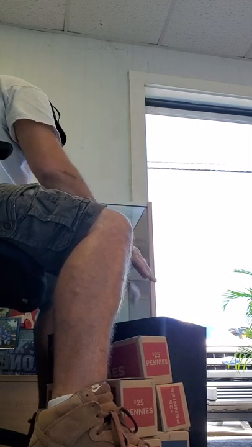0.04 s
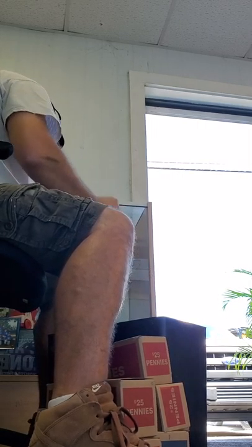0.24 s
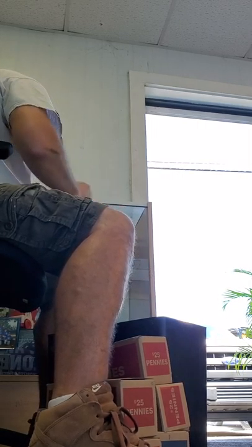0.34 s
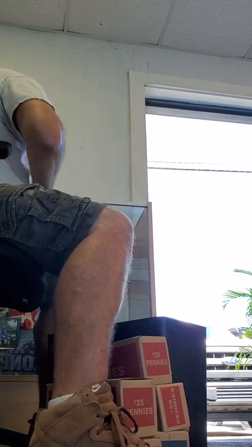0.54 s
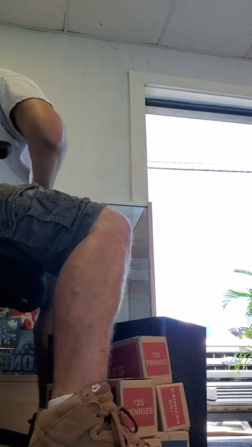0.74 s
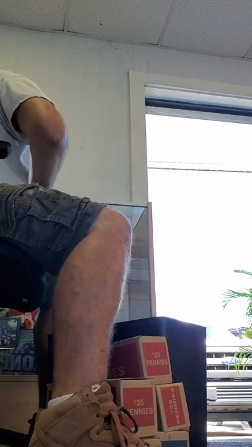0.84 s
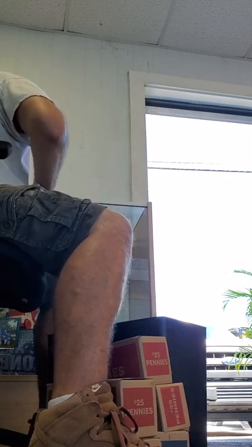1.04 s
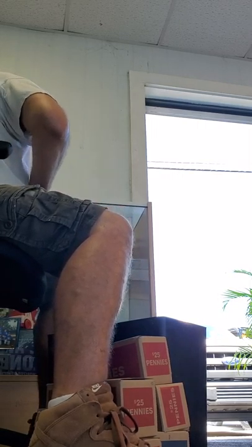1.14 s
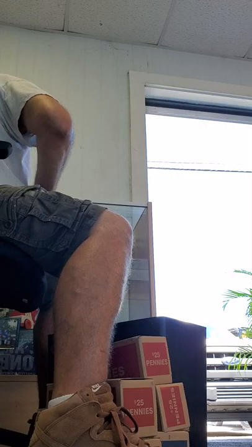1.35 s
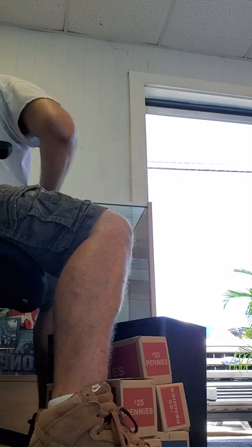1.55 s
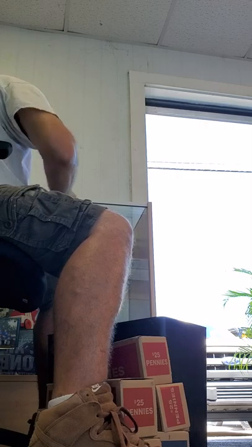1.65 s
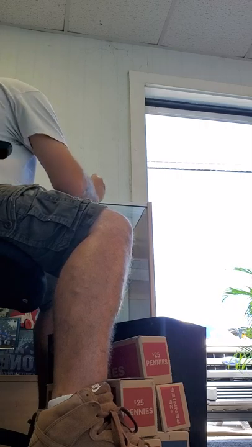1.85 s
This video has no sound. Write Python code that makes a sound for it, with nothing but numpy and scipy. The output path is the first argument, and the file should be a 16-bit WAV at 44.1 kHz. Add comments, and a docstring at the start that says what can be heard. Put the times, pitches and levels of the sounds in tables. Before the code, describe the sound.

A large mass of coins thuds onto a hard counter, then slides out in clattering, jingling surges and settles. Two faint nudges on the counter follow. Ventilation hums steadily in the small room, heard from close by.

```python
"""Ventilation hums in a small room, then a heavy load of coins thuds onto a shop counter.
The blow sets the counter ringing. The heap collapses and slides out in surges: thousands of tiny hits
clatter on the top, jingle edge against edge and shimmer as the faces skid over each other.
Two light nudges on the counter follow. The air hums throughout, and an automatic volume control
turns everything down during the crash and creeps back afterwards."""
import sys
import numpy as np
from scipy import signal
from scipy.fft import rfft, irfft
from scipy.io import wavfile
from scipy.ndimage import uniform_filter1d

SR = 44100
rng = np.random.default_rng(int(sys.argv[2]) if len(sys.argv) > 2 else 0)


def to_wav(sig):
    """Store sig (one row per channel, or 1-D mono) as 16-bit WAV at the path in sys.argv[1].

    Samples outside -1..1 are clipped; the rate is SR.
    """
    pcm = np.clip(np.atleast_2d(sig), -1, 1) * 32767
    pcm = np.round(pcm).astype(np.int16)
    wavfile.write(sys.argv[1], SR, pcm.T)  # frames by channels


N = 83790
T = np.arange(N) / SR
BIN_HZ = np.maximum(np.arange(N // 2 + 1) * SR / N, 1)  # the frequencies in a spectrum of the scene
CUTOFF_HZ, MIC_LAG_S = 15800, .0003  # top of the treble; usual limit of the left-right delay

# How alike the two microphones sound. Each row: frequency in Hz, likeness from 0 to 1.
STEREO_LIKENESS = [(100, 1), (300, 1), (650, 0.77), (1300, 0), (2500, 0), (15000, 0)]
# The tone of rushing air. Each row: frequency in Hz, relative level in dB.
AIR_TONE = [(30, -11.5), (50, -16), (75, -16), (100, -5), (140, -5), (200, -6.5), (300, -10), (450, -17),
            (700, -17), (1100, -23), (2200, -27.5), (3200, -40), (6000, -46.5), (9000, -53), (15500, -46.5)]
# The ventilation's hums. Each row: pitch in Hz, width in Hz, level in dB.
AIR_HUMS = [(137.2, 13, -44), (467, 7.2, -55.5), (3940, 88, -73.5), (6530, 71, -75.5)]
# How its deep drone swells and sinks. Each row: time in seconds, level in dB.
DRONE_LEVELS = [(0, -44), (.25, -44.5), (.55, -52), (.85, -46), (1.02, -37), (1.18, -46), (1.32, -41.5),
                (1.48, -45.5), (1.65, -40.5), (1.9, -36.5)]

# The counter's modes, the pitches at which it likes to ring. Each entry: pitch in Hz.
COUNTER_PITCHES = [143, 219, 250, 286, 322, 350, 426, 463, 538, 628, 700, 851, 1150]
# The same modes. Each row: level under a blow in dB, relative level under sliding coins in dB,
# ring time in seconds. A ring time (t60) is how long a sound takes to fade by 60 dB.
COUNTER_MODES = [(-14, -3.5, 0.3), (-15.5, -10, 0.23), (0.5, -1.5, 0.031), (-7.5, -2.5, 0.17),
                 (-9.5, -3.5, 0.17), (-14.5, -8, 0.127), (-21, -6, 0.2), (-14.5, -16.5, .14),
                 (-13, -6, 0.2), (-8, -8.5, 0.12), (-20.5, -16, 0.27), (-25.5, -12, 0.13), (-17, -9, 0.13)]
# Counter notes that swell as the heap spreads. Each entry: pitch in Hz.
NOTE_PITCHES = [351, 304, 1684]
# The same notes. Each row: start in seconds, rise in seconds, level in dB, ring time in seconds.
NOTE_SWELLS = [(.265, 0.071, -14.5, 0.4), (.44, 0.13, -27, 0.76), (.43, 0.16, -29, 0.18)]
# Blows of the load, then light nudges. Each row: start in seconds, level in dB, contact in seconds.
COUNTER_BLOWS = [(0.2449, -2, 0.00082), (0.2639, -10.5, 0.00084), (.279, -11.5, 0.00047),
                 (1.556, -28, 0.003), (1.794, -30, 0.0014)]
# Modes of the top under the coins. Each row: pitch in Hz, relative level in dB, ring time in seconds.
TOP_MODES = [(1463, -3, .09), (1685, 1, .13), (1797, -2, .12), (1857, -5, .1), (1908, -2, .11),
             (1973, -1, .08), (2058, -3, .09), (2145, -2, .08), (2503, -1, .08), (2920, -4, .05)]

# Clumps of coins dropping on the top. Each row: time in seconds, level in dB.
CLUMP_DROPS = [(0.246, -5), (.275, -0.5), (0.2914, 4), (.3135, 1), (0.336, -8), (.347, -8), (0.409, -13),
               (.434, 11), (.514, -1), (0.533, 8.5), (.536, 12.5), (0.544, 3), (0.587, 5), (.632, 2),
               (0.715, -6.5), (0.7254, -6)]
# Surges of sliding coins. Each row: start, rise and hold in seconds, then the levels of
# clatter, jingle and shimmer in dB.
COIN_SURGES = [(0.2418, 0.0027, 0.044, -17.5, -24.5, -27), (0.262, 0.0089, 0.057, -15.5, -25, -26.5),
               (0.314, 0.008, .018, -17.5, -21, -21), (0.349, 0.0079, 0.064, -18.5, -38, -37),
               (0.419, 0.0097, .052, -20, -25, -29), (0.479, 0.004, 0.022, -23.5, -31.5, -33),
               (0.526, 0.0033, 0.013, -23, -24, -33), (0.567, 0.0081, 0.012, -22.5, -27, -27.5),
               (0.631, 0.008, 0.014, -29, -35, -39.5), (0.66, 0.0084, 0.0231, -33, -40.5, -43),
               (0.71, 0.0044, 0.006, -32, -35, -37.5), (.742, 0.0053, 0.0057, -35, -53, -43),
               (0.864, 0.008, 0.0086, -41, -56, -55), (0.947, 0.018, 0.022, -54, -65, -61)]
# The tones of four coin sounds. Each row: frequency in Hz, relative level in dB.
CLACK_TONE = [(100, -48), (600, -23), (1400, -16.5), (2000, -1), (2600, 4), (3500, -7), (5500, -16),
              (9000, -38), (15000, -20)]  # clumps landing
CLATTER_TONE = [(70, -41.5), (200, -10), (600, -6.5), (900, -6), (1300, -6.5), (1900, -2.5), (2700, -5),
                (3700, -15.5), (5500, -21), (8000, -28), (15000, -41)]  # coins knocking on the top and the heap
JINGLE_TONE = [(300, -31), (1500, 2.5), (3000, 5), (4500, 5.5), (5800, 6.5), (7500, -2), (9500, -19.5),
               (12000, -8), (15500, -26)]  # edges clicking together
SHIMMER_TONE = [(2000, -9), (6000, -9), (8000, -5), (10000, -5), (11500, -2), (13000, -6.5), (14200, -7),
                (15500, -1)]  # faces skidding over each other
# Which way the crash leans. Each row: frequency in Hz, left level minus right level in dB.
STEREO_LEAN = [(200, -2), (550, 2), (1200, 0), (2600, 1), (5000, -1.5), (9000, -4), (14000, 1)]


def from_db(db):
    """Turn decibels into a number to multiply by."""
    return 10 ** (np.asarray(db) / 20)


def unit_level(x):
    """Scale a signal so that its average power is 1."""
    return x / np.sqrt(np.mean(x ** 2) + 1e-20)


def at_hz(table, hz):
    """Read between a table's rows, giving every octave equal space."""
    row_hz, values = np.transpose(table)
    return np.interp(np.log(hz), np.log(row_hz), values)


def ring(x, hz, t60):
    """One mode: each click in x starts a fading sine wave as tall as the click."""
    decay, step = from_db(-60 / (t60 * SR)), 2 * np.pi * hz / SR
    return signal.lfilter([0, np.sin(step)], [1, -2 * decay * np.cos(step), decay ** 2], x + 1e-18)


def resonate(x, modes):
    """Ring several modes at once, scaled so that white noise keeps its power."""
    out = sum(from_db(db) * ring(x, hz, t60) * np.sqrt(4 * np.log(1000) / (t60 * SR))
              for hz, db, t60 in modes)
    return out / np.sqrt(sum(from_db(db) ** 2 for _, db, _ in modes))


def colour(x, tone, size=4096):
    """Filter x to a tone table; white noise keeps its power."""
    hz = np.maximum(np.arange(size // 2 + 1) * SR / size, 1)
    gains = unit_level(from_db(at_hz(tone, hz)) * np.where(hz > CUTOFF_HZ, .5, 1))
    # Make the filter sound only after each click, never before it (minimum phase).
    cepstrum = irfft(np.log(gains))
    cepstrum[1:size // 2] *= 2
    cepstrum[size // 2 + 1:] = 0
    response = irfft(np.exp(rfft(cepstrum)))
    return signal.fftconvolve(x, response[None], axes=1)[:, :x.shape[1]]


def stereo_noise():
    """White noise, alike at both microphones in the bass and unrelated in the treble."""
    alike = at_hz(STEREO_LIKENESS, BIN_HZ)
    mid, side = rfft(rng.standard_normal((2, N)))
    return irfft(np.sqrt((1 + alike) / 2) * mid + np.sqrt((1 - alike) / 2) * side * [[1], [-1]], N)


def room(x, echo_db, t60=.22, wall_delay_s=.003):
    """Nearby walls add a short, dense tail of echoes; the power stays about the same."""
    tail = stereo_noise() * from_db(-60 * T / t60) * (T > wall_delay_s)
    tail = tail[:, :SR // 2] / np.sqrt(np.sum(tail ** 2) / 2)
    echoes = signal.fftconvolve(x, tail, axes=1)[:, :N]
    gain = from_db(echo_db)
    return (x + gain * echoes) / np.sqrt(1 + gain ** 2)


def humming(hz, width_hz):
    """Noise held in one narrow resonance makes a wavering hum."""
    band = signal.butter(2, [hz - width_hz / 2, hz + width_hz / 2], "band", fs=SR, output="sos")
    noise_twice = np.tile(stereo_noise(), 2)  # the first half lets the filter settle
    return unit_level(signal.sosfilt(band, noise_twice)[:, N:])


def ventilation():
    """Moving air makes a steady rush, a few hums and a deep drone that swells and sinks."""
    rush = from_db(-39.5) * unit_level(colour(np.tile(stereo_noise(), 2), AIR_TONE)[:, N:])
    hum = sum(from_db(db) * humming(hz, width_hz) for hz, width_hz, db in AIR_HUMS)
    drone = from_db(np.interp(T, *np.transpose(DRONE_LEVELS))) * humming(hz=80.9, width_hz=22.2)
    return rush + hum + drone


def swelling_notes():
    """Single modes of the counter build up under the moving coins and ring out."""
    out = 0
    for hz, (start, rise, db, t60) in zip(NOTE_PITCHES, NOTE_SWELLS):
        age = T - start
        swell = np.clip(age / rise, 0, 1) * from_db(-60 * np.maximum(age - rise, 0) / t60)
        out += from_db(db) * swell * np.sin(2 * np.pi * hz * age)
    return out


def lose_deep_bass(x, below_hz=130.5):
    """The counter is too small to send deep bass into the air."""
    return signal.sosfilt(signal.butter(5, below_hz, "high", fs=SR, output="sos"), x)


def thud():
    """Each blow is one soft push that sets the counter's modes ringing."""
    force, ringing = np.zeros((2, N))
    for start, db, contact_s in COUNTER_BLOWS:
        push = np.sin(np.pi * np.clip((T - start) / contact_s, 0, 1)) ** 2
        force += from_db(db) * push / push.sum()
    for k, (hz, (db, _, t60)) in enumerate(zip(COUNTER_PITCHES, COUNTER_MODES)):
        direction = (-1) ** (k // 3)  # flips after every three modes
        ringing += direction * from_db(db) * ring(force, hz, t60)
    body = lose_deep_bass(ringing)
    return room(np.array([body, body]), echo_db=-5.5)


def counter_rumble(hits, strength):
    """Only a heavy flow of coins shakes the whole counter."""
    modes = [(hz, db, t60) for hz, (_, db, t60) in zip(COUNTER_PITCHES, COUNTER_MODES)]
    weight = (strength / strength.max()) ** .43
    return lose_deep_bass(resonate(hits * weight, modes))


def clumps(coins_each=7, spread_s=.006):
    """A few coins land within milliseconds of each other and make one clack."""
    clicks = np.zeros((2, N))
    for start, db in CLUMP_DROPS:
        late, lag, sign = rng.uniform(-1.1, 1, (3, coins_each))
        landing = start + spread_s * late ** 2
        for channel, arrival in zip(clicks, (landing, landing + MIC_LAG_S * lag)):
            channel[(arrival * SR).astype(int)] += from_db(db) * np.sign(sign) / np.sqrt(coins_each)
    return colour(clicks, CLACK_TONE)


def flow(settle_db_per_s=409):
    """The strength of clatter, jingle and shimmer over time: each surge rises, holds and settles."""
    power = np.zeros((3, N))
    for start, rise, hold, *levels_db in COIN_SURGES:
        rising = np.clip((T - start) / rise, 0, 1)
        settling = from_db(-settle_db_per_s * np.maximum(T - start - rise - hold, 0))
        power += (from_db(levels_db)[:, None] * rising * settling) ** 2
    return np.sqrt(power)


def contacts(strength, base_per_s=1500, extra_per_s=3500, spread_db=3):
    """Coins touch in random clicks, more often and more loudly when the flow is strong."""
    rate = base_per_s + extra_per_s * strength / strength.max()
    sizes = from_db(spread_db * np.minimum(rng.exponential(1, N), 4)) * rng.choice([-1, 1], N)
    clicks = sizes * (rng.random(N) < rate / SR)
    local_power = np.abs(uniform_filter1d(clicks ** 2, size=700))
    left = clicks * strength / np.sqrt(local_power + 1e-3)
    # Each click reaches the right microphone a little earlier or later.
    lag = np.round(rng.uniform(-1, 1, N) * MIC_LAG_S * SR).astype(int)
    right = np.bincount(np.clip(np.arange(N) + lag, 0, N - 1), left, N)
    return np.array([left, right])


def coin_rings(strength, count=24, low_hz=12300, high_hz=14400, t60=.09):
    """Coins pressed in the heap ring only briefly, each at its own pitch."""
    clicks = contacts(strength)
    which_coin = rng.integers(0, count, N)
    pitches = rng.uniform(low_hz, high_hz, count)
    return sum(resonate(clicks * (which_coin == k), [(hz, 0, t60)]) for k, hz in enumerate(pitches))


def sliding_coins():
    """The sliding heap knocks on the top, jingles, shimmers, drops clumps and shakes the counter."""
    clatter, jingle, shimmer = flow()
    hits = contacts(clatter)
    knocks = colour(hits, CLATTER_TONE)
    top = from_db(-4.5) * resonate(contacts(clatter), TOP_MODES)
    edges = colour(contacts(jingle), JINGLE_TONE)
    faces = colour(contacts(shimmer), SHIMMER_TONE)
    rings = from_db(-8) * coin_rings(shimmer)
    rumble = from_db(-4) * counter_rumble(hits, clatter)
    return room(knocks + top + edges + faces + rings + clumps(), echo_db=-.5) + rumble


def scene():
    """The crash, leaning left or right by frequency, over the hum of the ventilation."""
    crash = thud() + sliding_coins() + swelling_notes()
    lean = from_db(at_hz(STEREO_LEAN, BIN_HZ) * [[.5], [-.5]])
    return irfft(rfft(crash) * lean, N) + ventilation()


def record(dry, threshold_db=-18, duck_share=.55, attack_s=.12, recover_db_per_s=5):
    """The volume ducks on the crash and creeps back; peaks are capped and the highest treble is cut."""
    power = np.abs(uniform_filter1d(np.mean(dry ** 2, axis=0), size=400))
    level_db = 10 * np.log10(power + 1e-12)
    wanted_cut_db = duck_share * np.maximum(level_db - threshold_db, 0)
    recovery_db = recover_db_per_s * T
    held_cut_db = np.maximum.accumulate(wanted_cut_db + recovery_db) - recovery_db
    smoothing = np.exp(-1 / (attack_s * SR))
    cut_db = signal.lfilter([1 - smoothing], [1, -smoothing], held_cut_db)
    capped = np.clip(dry * from_db(-cut_db), -1, 1)
    return signal.sosfilt(signal.ellip(12, .1, 80, CUTOFF_HZ, fs=SR, output="sos"), capped)


dry = scene()
out = record(dry)
to_wav(out)
```